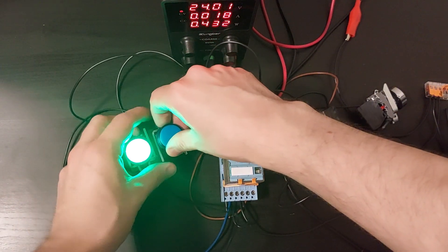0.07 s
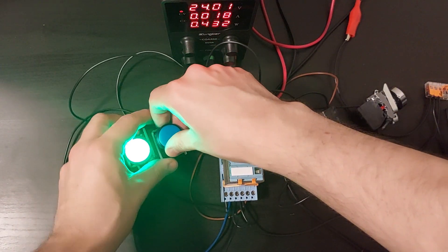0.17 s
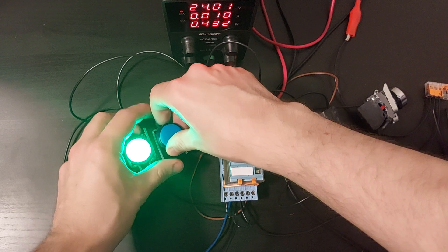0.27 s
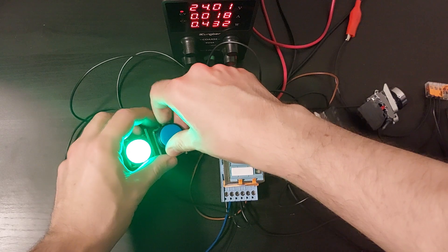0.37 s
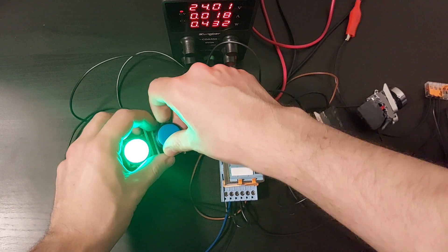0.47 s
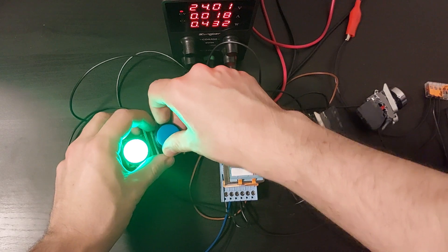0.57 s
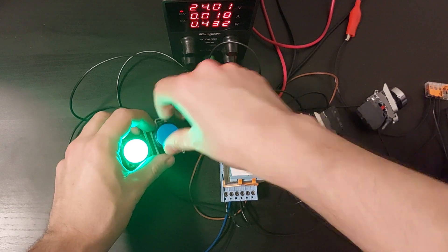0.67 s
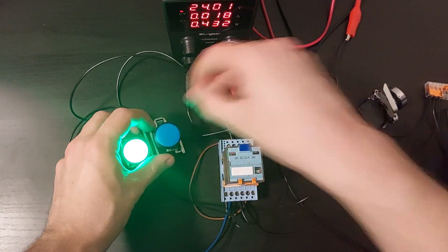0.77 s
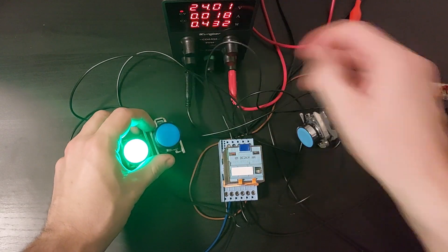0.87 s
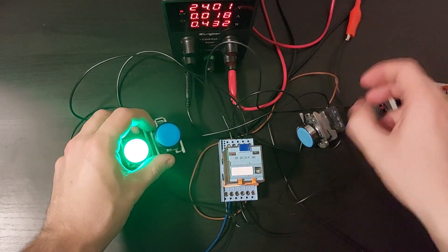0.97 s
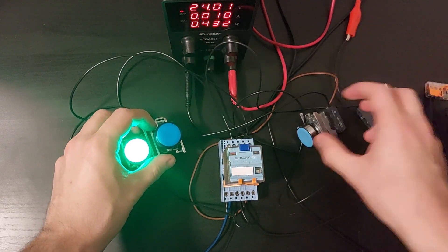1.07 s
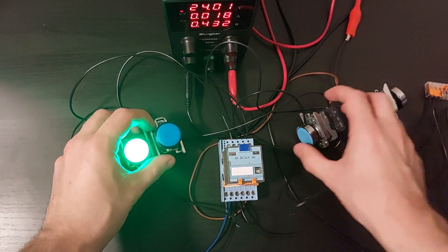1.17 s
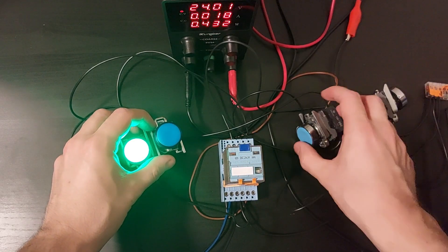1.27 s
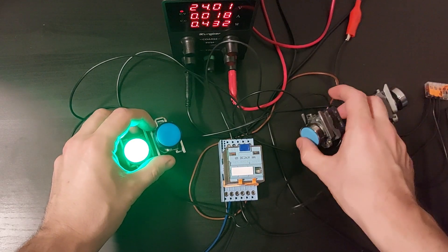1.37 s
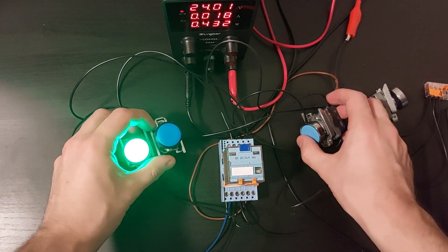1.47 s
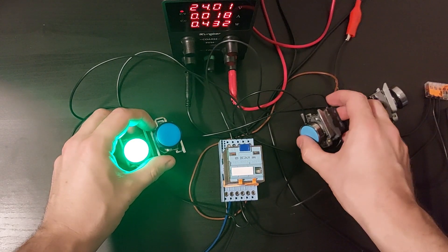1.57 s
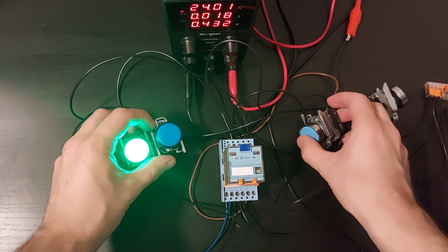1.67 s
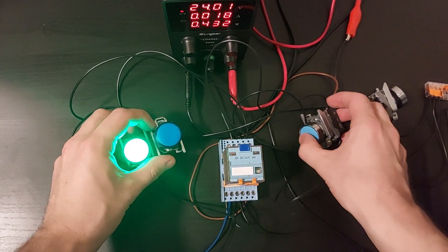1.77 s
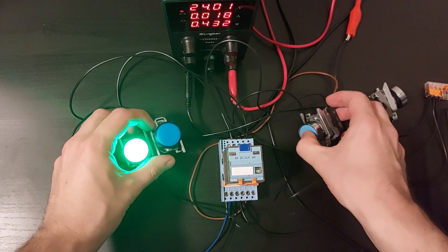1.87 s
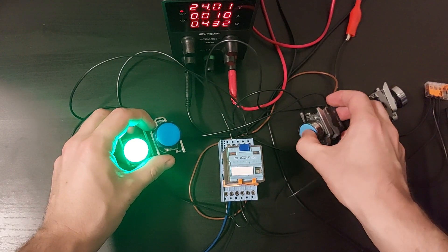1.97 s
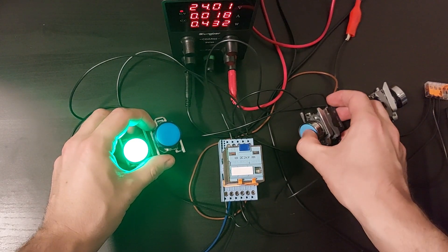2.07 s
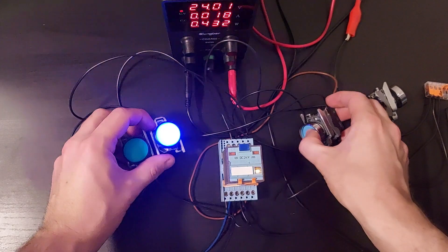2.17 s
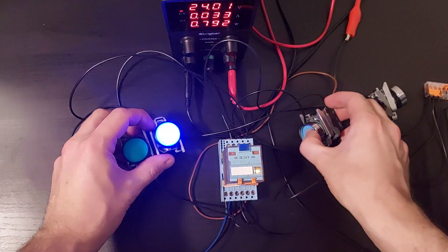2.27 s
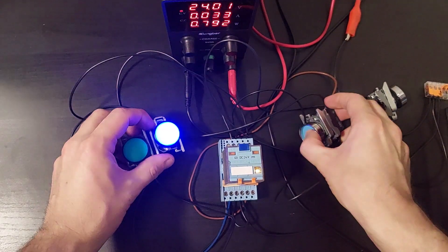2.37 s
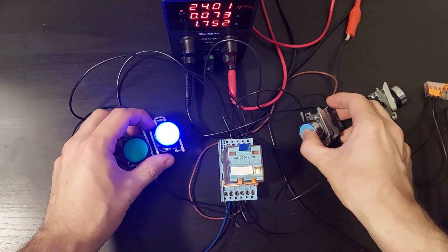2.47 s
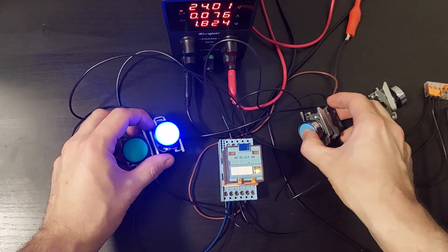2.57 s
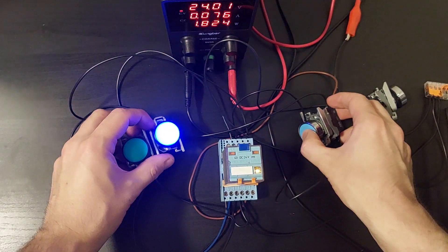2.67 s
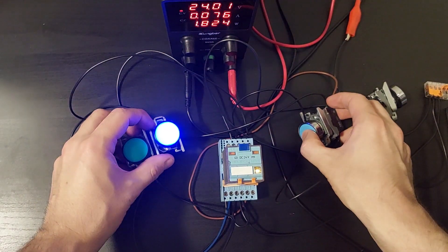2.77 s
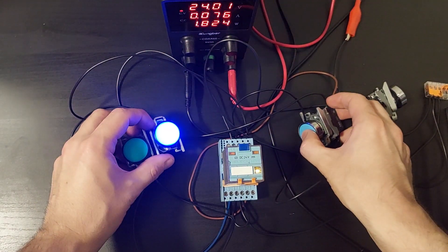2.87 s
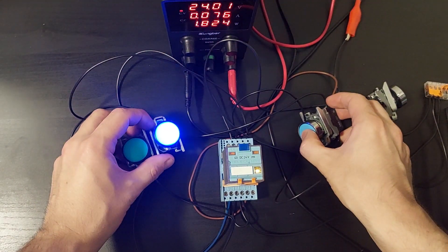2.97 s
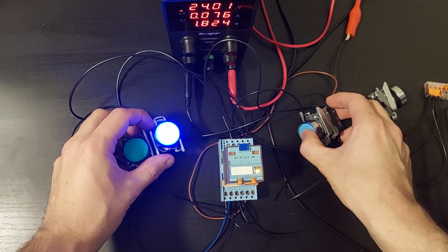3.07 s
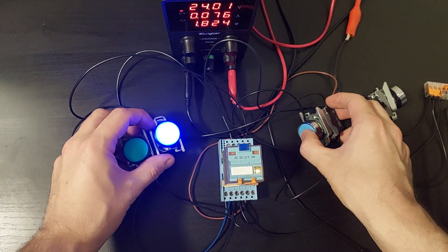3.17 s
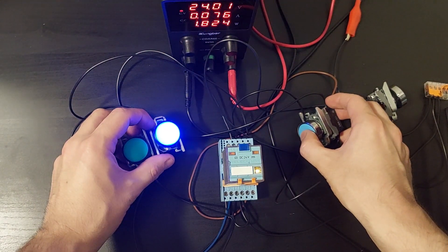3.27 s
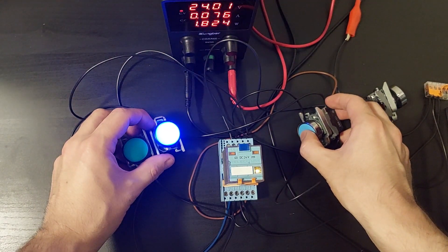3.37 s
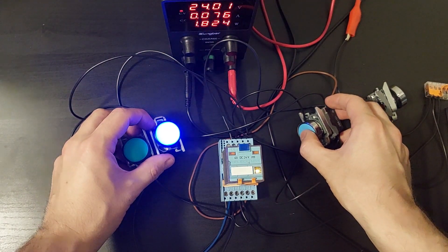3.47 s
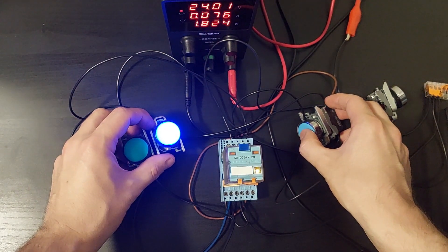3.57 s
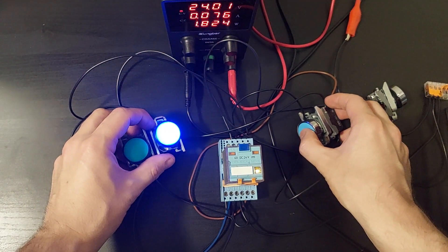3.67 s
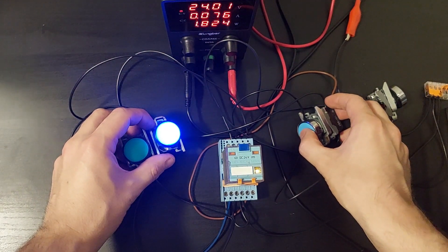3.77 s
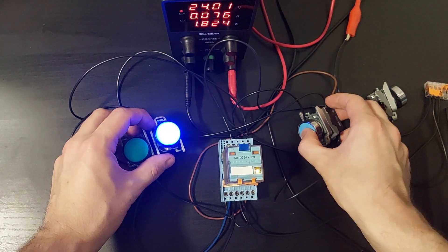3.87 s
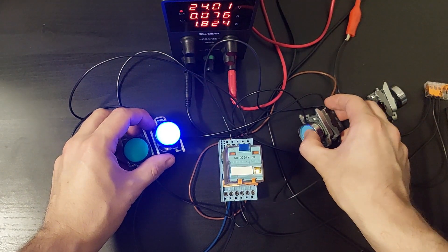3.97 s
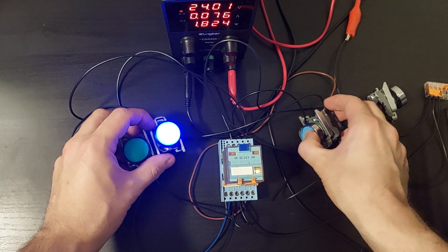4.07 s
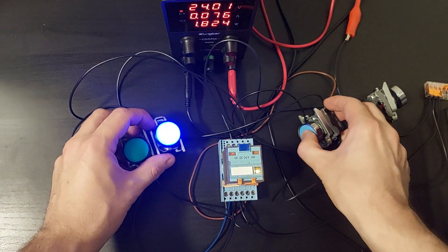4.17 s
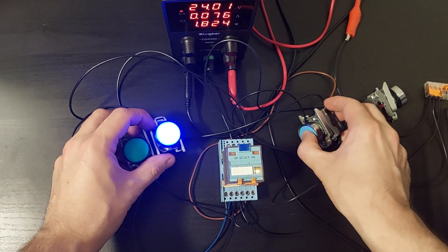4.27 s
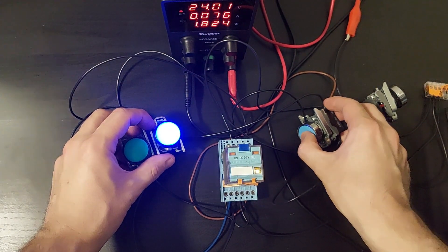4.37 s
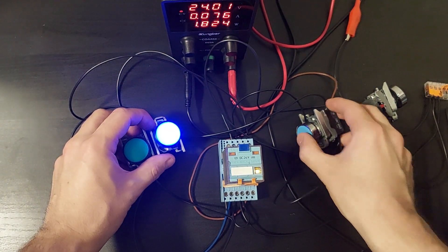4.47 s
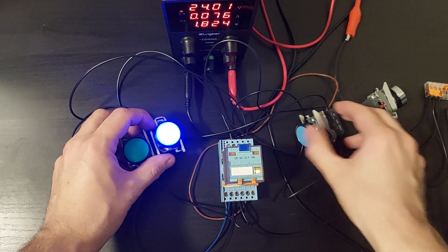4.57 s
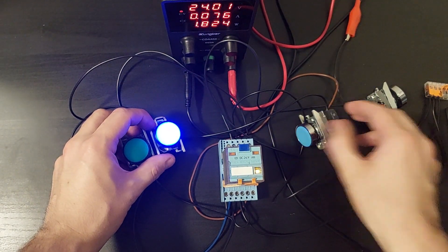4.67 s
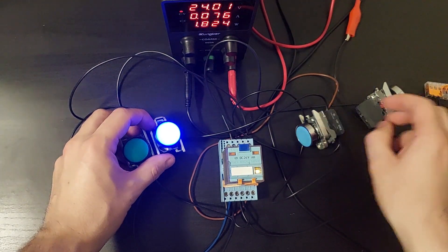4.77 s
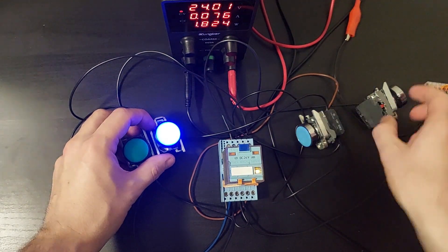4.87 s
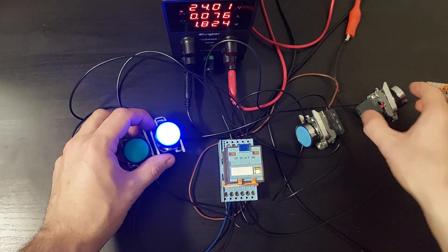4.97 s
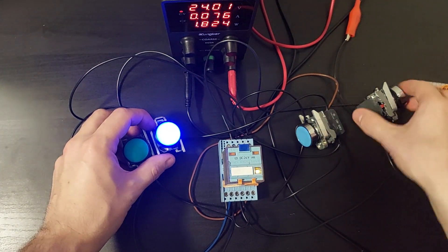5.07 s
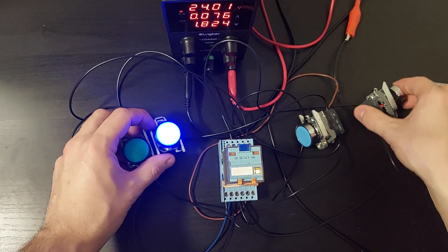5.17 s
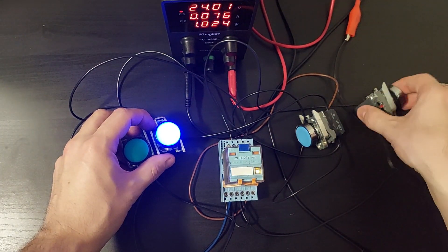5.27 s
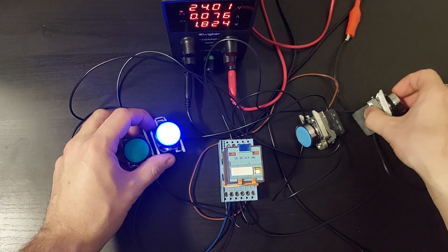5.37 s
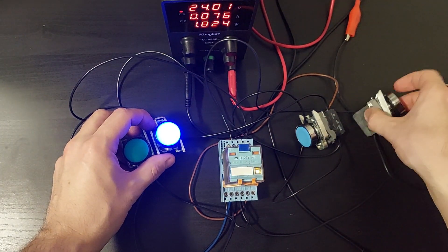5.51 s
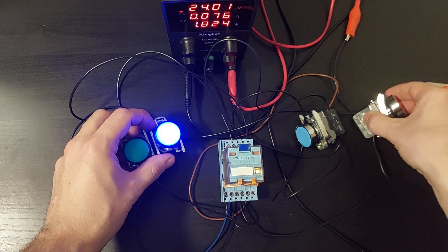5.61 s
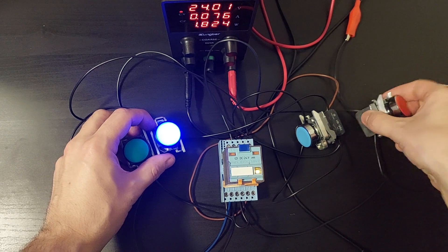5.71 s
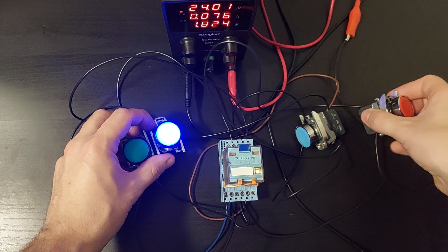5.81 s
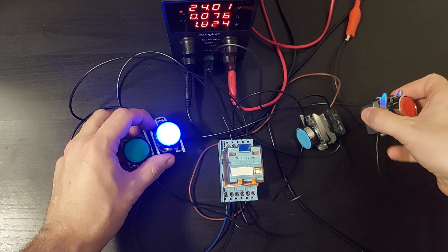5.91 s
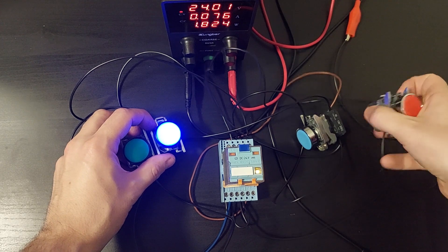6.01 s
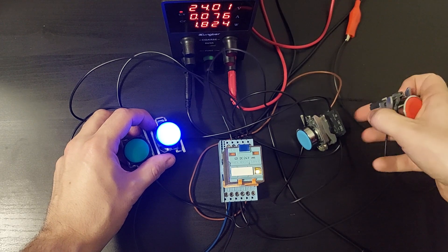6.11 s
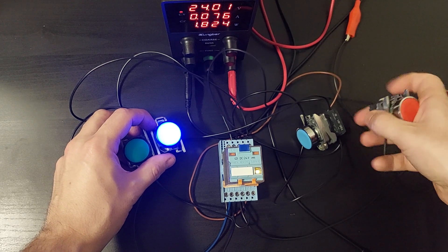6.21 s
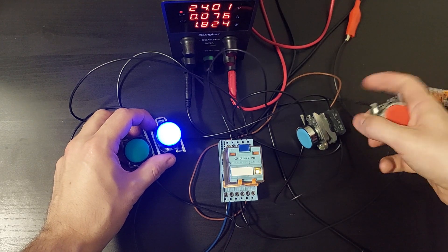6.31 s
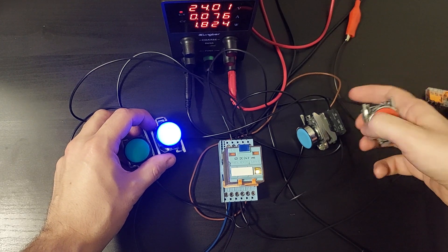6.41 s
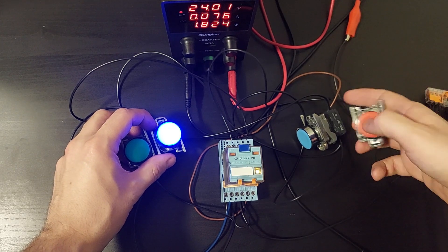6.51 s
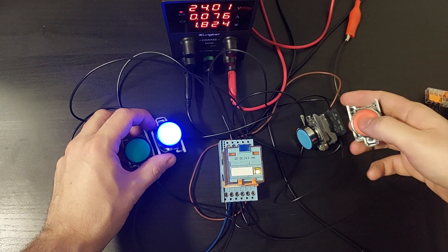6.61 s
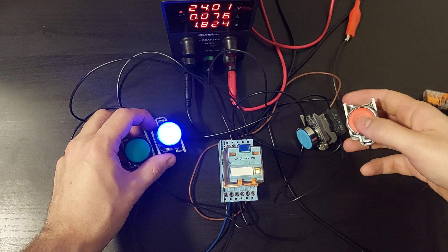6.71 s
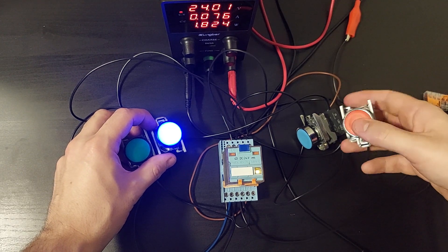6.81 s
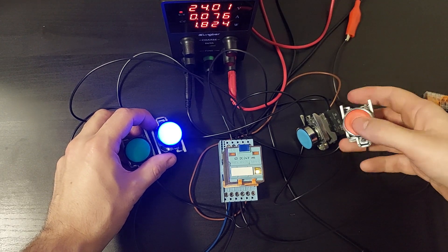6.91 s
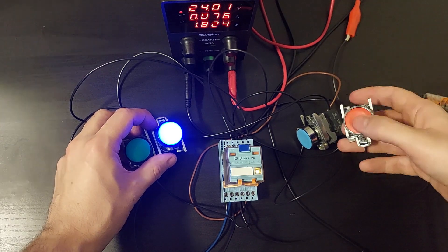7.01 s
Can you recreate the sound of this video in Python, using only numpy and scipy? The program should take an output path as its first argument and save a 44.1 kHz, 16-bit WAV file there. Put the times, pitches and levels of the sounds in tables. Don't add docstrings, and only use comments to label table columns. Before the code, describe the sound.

Close plastic clicks and dull wooden thumps as hands shift switches, one loud metallic relay snap, a quiet spell, then a harder burst of clicks.

```python
import sys
import numpy as np
from scipy import signal
from scipy.fft import rfft, irfft
from scipy.io import wavfile
from scipy.ndimage import uniform_filter1d

SR = 44100
rng = np.random.default_rng(int(sys.argv[2]) if len(sys.argv) > 2 else 0)


def magnitude_from_level(level_db):
    exponent = np.asarray(level_db, float) / 20
    return 10 ** exponent


def file_out(sig):
    cols = np.atleast_2d(sig).T
    lim = np.clip(cols, -1, 1)
    pcm = np.round(lim * 32767).astype(np.int16)
    wavfile.write(sys.argv[1], SR, pcm)


N = 310905


def at_hz(points, hz):
    table = np.array(points)
    return np.interp(np.log(hz), np.log(table[:, 0]), table[:, 1])


def rms_one(x):
    return x / np.sqrt(np.mean(x ** 2) + 1e-20)


def band(x, low_hz, high_hz):
    return signal.sosfilt(signal.butter(2, [low_hz, min(high_hz, .45 * SR)], "band", fs=SR, output="sos"), x)


def ring(force, hz, t60):
    r, w = magnitude_from_level(-60 / (t60 * SR)), 2 * np.pi * hz / SR
    return signal.lfilter([0, np.sin(w)], [1, -2 * r * np.cos(w), r * r], force + 1e-18)


def add(out, sound, s, pan_db=0., lag_s=0.):
    starts = (s + max(lag_s, 0), s + max(-lag_s, 0))
    for side, start, sign in zip(out, starts, (.5, -.5)):
        i = max(round(start * SR), 0)
        side[i:i + len(sound)] += sound[:N - i] * magnitude_from_level(sign * pan_db)


def gated(s, length_s, db):
    away = np.abs(np.arange(N) / SR - s) / (length_s / 2)
    gain = magnitude_from_level(db - 14.5 * away) * (away < 1)
    return uniform_filter1d(gain, size=600)


def contacts(count, t, fade_s, rough):
    force = rough * rng.standard_normal((count, len(t))) * np.exp(-t / fade_s)
    force[:, 0] = 3
    spectrum = rfft(force)
    colour = uniform_filter1d(np.abs(spectrum), size=15)
    even = spectrum * colour.mean(axis=1, keepdims=True) / colour
    return irfft(even, len(t)) * np.exp(-t / (4 * fade_s))


def placed(tables):
    # lowest bench modes in dB, left over right for knocks in dB,
    # broad crack of ticks in dB, left over right for ticks in dB.
    places = [
        (4, 2.5, 3.5, 0),
        (-2, -4, 10, 2),
        (-8, -5, 4, 0.5),
        (-7, -6, -2, -1),
    ]
    upper_modes_db = [-4, 2.5, 3, 1]
    touches = []
    for rows, place, upper_db in zip(tables, places, upper_modes_db):
        touches += [(row, (*place, upper_db)) for row in rows]
    return touches


def floor():
    # frequency in Hz, level in dB per Hz.
    noise_colour = [(15, -38.5), (28, -5.5), (45, -5), (110, -1), (150, -2), (190, -15.5), (270, -9.5),
                    (400, -19), (800, -25), (2000, -32.5), (4500, -40.5), (9000, -38.5), (12500, -39.5),
                    (15500, -63.5)]
    # frequency in Hz, likeness of left and right (1 is the same noise).
    likeness = [(60, 1), (240, 0.5), (950, 0), (3800, 0), (15000, 0.14)]
    hz = np.maximum(np.fft.rfftfreq(N, 1 / SR), 10)
    mid, side = rfft(rng.standard_normal((2, N))) * magnitude_from_level(at_hz(noise_colour, hz))
    alike = np.clip(at_hz(likeness, hz), 0, 1)
    pair = np.sqrt(1 + alike) * mid + np.sqrt(1 - alike) * side * np.array([[1], [-1]])
    return magnitude_from_level(-68) * rms_one(irfft(pair, N))


def hum():
    # frequency in Hz, amount of waver, left over right in dB, lead of the left in radians.
    lines = [(66, 1, 1.5, 0.27), (95.7, 0.17, -3, 0.14), (130.5, 1, 4.5, 0.42)]
    # level in dB at mean load, share of the load's swing.
    follows = [(-64, .25), (-64.5, 1), (-68, 0.13)]
    # time in seconds, level in dB.
    load = [(0.0, -73), (0.61, -58.5), (0.76, -77), (1.25, -55.5), (1.57, -64.5), (1.98, -54),
            (2.63, -61.5), (2.77, -55.5), (3.16, -58), (3.45, -72.5), (4.69, -66.5), (4.85, -76),
            (5.46, -51), (5.75, -70), (6.09, -58), (6.48, -60), (6.77, -79.5), (7.05, -79)]
    out, t, sides = np.zeros((2, N)), np.arange(N) / SR, np.array([[.5], [-.5]])
    load_db = np.interp(t, *np.transpose(load))
    for (hz, waver, pan_db, lead), (db, share) in zip(lines, follows):
        steps = np.cumsum(rng.standard_normal(80)) * 0.58 * np.sqrt(waver)
        phase = 2 * np.pi * hz * t + np.interp(t, np.arange(80) / 10, steps)
        level = magnitude_from_level(db + share * (load_db - load_db.mean()))
        out += np.sqrt(2) * level * np.sin(phase + 2 * lead * sides) * magnitude_from_level(sides * pan_db)
    return out


def drags():
    # moment of
    # most pressure in seconds, length in seconds, scrape in dB, treble in dB against the scrape.
    strokes = [(0.0, 0.051, -46, -15), (0.566, .12, -84, -5), (1.357, 0.11, -77, -10),
               (1.49, 0.21, -76, -11), (1.637, 0.099, -64.5, -18), (1.774, 0.086, -82, 6),
               (4.044, 0.087, -71.5, -8), (4.29, .15, -90, 7), (4.563, 0.28, -82.5, -21.5),
               (5.263, 0.16, -80, -12), (5.416, 0.088, -46, -20), (5.522, 0.3, -65, -10.5),
               (5.806, 0.2, -69, -16.5), (5.999, 0.18, -63.5, -17.5), (6.077, 0.1, -61, -7.5),
               (6.529, 0.07, -67.5, -26), (6.796, 0.18, -72, -35)]
    # moment of most pressure in seconds, length in seconds,
    # level in dB, pitch in Hz.
    squeaks = [(1.287, 0.19, -76.5, 2280), (1.467, 0.081, -74, 2170), (1.546, .05, -78, 2270),
               (1.647, .05, -74, 2240), (1.588, 0.035, -68, 2290), (4.021, 0.05, -68, 2160),
               (6.53, .055, -61.5, 2293), (6.581, 0.017, -64, 2700)]
    sizes = magnitude_from_level(2 * rng.exponential(1, (2, N))) * rng.standard_normal((2, N))
    grains = sizes * (rng.random((2, N)) < 5000 / SR)
    low = rms_one(band(band(grains[0], 310, 1740), 400, 4000))
    high = rms_one(band(grains[1], 2300, 14000))
    out = np.zeros(N)
    for s, length_s, db, treble_db in strokes:
        out += gated(s, length_s, db) * (low + magnitude_from_level(treble_db) * high)
    for s, length_s, db, hz in squeaks:
        out += gated(s, length_s, db) * rms_one(ring(sizes[0], hz, 0.025))
    return out * np.ones((2, 1))


def ticks():
    # start in seconds, peak in dB, ring in Hz, treble in dB.
    lamp = [(0.0, -30.5, 2290, -8), (0.6716, -58.5, 2340, 10), (0.6943, -44, 2320, 1),
            (0.7297, -30.5, 2860, -9.5), (0.9771, -48.5, 2400, 6)]
    start = [(1.344, -72, 2380, -20), (1.6152, -56, 2430, -23), (1.727, -69, 2480, -12),
             (1.737, -61, 2720, 3), (1.7473, -58, 2450, 18.5), (1.7589, -59, 2430, -18),
             (1.7929, -77, 2140, -15), (2.0894, -67.5, 8000, -1), (2.1322, -55, 2230, -25),
             (2.454, -45.5, 3700, -41), (2.4776, -47, 2184, -40), (2.5504, -60, 2360, 20)]
    release = [(3.8487, -65.5, 2230, -21), (3.9115, -62, 2120, -23), (4.0006, -58.5, 2060, 21.5),
               (4.033, -50.5, 1915, -18), (4.2443, -44.5, 5070, 7.5), (4.2824, -49, 3450, -30),
               (4.3121, -55, 2050, -20), (4.469, -65, 2064, -12)]
    stop = [(5.336, -47.5, 1940, -5), (5.3808, -71, 1820, -7), (5.4044, -33, 2500, -25),
            (5.4257, -25.5, 2330, -3), (5.43, -40.5, 6260, -20), (5.444, -33.5, 2650, -28),
            (5.447, -47, 6100, -20), (5.4688, -34.5, 2550, 0.5), (5.5114, -33.5, 2700, -27),
            (5.5544, -52, 6580, -15), (5.566, -59, 1840, -12), (5.599, -34, 2500, -9),
            (5.7713, -59, 2220, -20), (5.8335, -48.5, 2064, 6), (6.1433, -40, 2720, 9),
            (6.3088, -35.5, 2580, 1.5), (6.383, -64.5, 2470, 20.5), (6.4601, -54, 2670, 7.5),
            (6.5151, -56, 2260, -25), (6.574, -57, 2200, 10.5), (6.6124, -33, 2660, -2),
            (6.6467, -38, 2920, 3)]
    out, t = np.zeros((2, N)), np.arange(round(.08 * SR)) / SR
    touches = placed([lamp, start, release, stop])
    bursts = contacts(count=len(touches), t=t, fade_s=.003, rough=.6)
    lags = rng.uniform(-1, 1, len(touches)) * 0.00042
    for burst, lag_s, ((s, db, hz, treble_db), (_, _, mid_db, pan_db, _)) in zip(bursts, lags, touches):
        shell = ring(burst, hz, .01)
        crack = .5 * magnitude_from_level(mid_db) * band(burst, 2000, 6100)
        tick = band(crack - 0.69 * shell / np.abs(shell).max(), 1500, 19000)
        treble = .5 * magnitude_from_level(treble_db) * band(burst, 4700, 18000)
        add(out, magnitude_from_level(db - 4.0) * (tick + treble), s, pan_db, lag_s)
    return out


def bench():
    # frequency in Hz, level in dB, time to fall 60 dB in seconds.
    top_modes = [(250.2, -2.5, 0.11), (312.3, 1, 0.2), (343.2, 1, 0.21), (326, -4.5, 0.06),
                 (378.5, -5, 0.21), (435.4, -11.5, 0.39), (475.5, -9, 0.059), (543.2, -12, 0.21),
                 (628, -12.5, 0.037), (751.3, -19.5, 0.055), (856, -24.5, 0.18)]
    # time in seconds, peak in dB, rattle in dB, contact in ms.
    lamp = [(0.0, -27.5, 2, 1.1), (0.241, -59.5, -40, 14.7), (0.356, -55, -26.5, 10),
            (0.404, -52.5, -0.5, 13), (0.515, -40.5, 2, 9.3), (0.538, -25, -5.5, 14.9),
            (0.691, -41, 10.5, 21), (0.729, -35, 15, 10.4), (0.76, -71, 12, 8.4), (0.979, -60, 19, 3.2)]
    start = [(1.27, -58, 0, 8.7), (1.309, -50.5, -2, 10.6), (1.347, -50, 1, 6.1), (1.426, -43, 1, 11.5),
             (1.446, -35, 2.5, 8.9), (1.523, -31.5, -5.5, 12), (1.566, -46.5, -7, 9.2),
             (1.616, -34.5, -29, 13.4), (1.635, -33.5, -15, 10), (1.699, -45.5, -1, 9.2),
             (1.751, -40.5, 9.5, 20), (1.793, -36, 5.5, 9.2), (1.937, -46.5, -5.5, 15.7),
             (2.092, -51.5, 1.5, 10.6), (2.135, -51, 10, 12), (2.187, -51, 4.5, 12.6),
             (2.242, -39, 15, 7.6), (2.443, -38, 1.5, 8.5), (2.48, -41, 6, 7.8), (2.551, -49.5, 4.5, 9.7),
             (2.68, -57, 6.5, 6.3)]
    release = [(3.852, -61.5, 10, 10.5), (3.97, -54.5, -7, 16.7), (4.024, -39, -4.5, 19.6),
               (4.085, -43, -14, 9), (4.236, -56, -4, 6), (4.267, -51.5, 4.5, 8.1), (4.299, -49, 10, 11),
               (4.485, -47.5, -10, 9.6), (4.635, -52.5, -9, 8.8)]
    stop = [(5.217, -55, -6, 9), (5.251, -48, -33, 10), (5.359, -41.5, 4.5, 14), (5.387, -32, -17, 11),
            (5.424, -26.5, 8, 8), (5.47, -37, -8, 8), (5.893, -56, -7, 10), (5.948, -43, -10, 14),
            (5.998, -57, 21, 9), (6.743, -55, -8, 15), (6.776, -53.5, -4, 8)]
    # level in dB, pitch in Hz, time to fall 60 dB in seconds.
    wrist = (-30.5, 86, 0.047)
    wrist_times = (5.343, 5.367)
    out, t = np.zeros((2, N)), np.arange(round(.25 * SR)) / SR
    knocks = placed([lamp, start, release, stop])
    luck_db = rng.normal(0, 3, (len(knocks), len(top_modes)))
    phases = rng.uniform(0, 2 * np.pi, luck_db.shape)
    rough = rng.standard_normal((len(knocks), len(t)))
    hz, mode_db, t60 = np.transpose(top_modes)[:, :, None]
    fade_db = -60 * np.maximum(t - 0.013, 0) / np.clip(t60, .05, .16)
    for k, ((s, db, rattle_db, contact_ms), (low_db, pan_db, _, _, upper_db)) in enumerate(knocks):
        contact_s = np.clip(contact_ms, 1, 40) / 1000
        swell = np.sin(np.pi / 2 * np.minimum(t / contact_s, 1)) ** 2
        strength_db = mode_db + luck_db[k][:, None] + low_db * (hz < 275) + upper_db * (hz > 420)
        modes = magnitude_from_level(strength_db + fade_db) * np.sin(2 * np.pi * hz * t + phases[k][:, None])
        boom = swell * modes.sum(axis=0)
        loose = rough[k] * swell * magnitude_from_level(-60 * t / 0.17)
        rattle = band(band(loose, 600, 2300), 600, 2300)
        knock = boom / np.abs(boom).max() + magnitude_from_level(rattle_db - 21.5) * rattle / np.abs(rattle).max()
        add(out, magnitude_from_level(db) * knock, s - .7 * contact_s, pan_db)
    db, hz, t60 = wrist
    push = np.r_[np.hanning(200) / 100, 0 * t]
    for s in wrist_times:
        add(out, -magnitude_from_level(db) * ring(push, hz, t60), s, -10.5)
    return out


def relay():
    # time in seconds, level in dB.
    bounces = [
        (2.2136, -45.5),
        (2.2265, -56),
        (2.2302, -20),
        (2.232, -23),
        (2.233, -16),
        (2.2355, -34),
        (2.241, -34),
        (2.2445, -36.5),
    ]
    # frequency in Hz, level in dB, time to fall 60 dB in seconds.
    case_modes = [(1400, -4, .012), (2270, -7, .008), (3540, 2, .016), (4050, 0, .01), (5350, -4, .006),
                  (5800, -3, .008), (7200, -5, .004), (9000, -12, .003), (12400, 3, .004),
                  (13900, -7, .003), (15300, 0, .003)]
    # frequency in Hz, level in dB, time to fall 60 dB in seconds.
    spring_tones = [(2213, -60, 1.25), (3610, -64, .75)]
    snap, t = np.zeros((2, N)), np.arange(round(.1 * SR)) / SR
    bursts = contacts(count=len(bounces), t=t, fade_s=0.0031, rough=0.78)
    for burst, (s, db) in zip(bursts, bounces):
        case = np.zeros(len(t))
        for k, (hz, mode_db, t60) in enumerate(case_modes):
            case += (-1) ** k * magnitude_from_level(mode_db) * ring(burst, hz, np.clip(t60, .002, .016))
        case = band(case, 1150, 19000)
        crack = magnitude_from_level(-6) * band(burst, 2000, 19000)
        add(snap, magnitude_from_level(db) * (case / np.abs(case).max() + crack), s, pan_db=0.5, lag_s=.000023)
    blow = np.r_[1., np.zeros(2 * SR)]
    spring = np.zeros((2, N))
    for hz, db, t60 in spring_tones:
        add(spring, magnitude_from_level(db) * ring(blow, hz, t60), bounces[2][0])
    return snap, spring


def room(x):
    # frequency in Hz, time for echoes to fall 60 dB in seconds.
    echo_times = [(300, 0.25), (1500, 0.21), (4000, 0.17), (9000, 0.2), (14000, 0.15)]
    t = np.arange(round(.4 * SR)) / SR
    mid, side = rng.standard_normal((2, len(t)))
    side = signal.sosfilt(signal.butter(1, 514, "high", fs=SR, output="sos"), side)
    noise = np.array([mid + side, mid - side])
    edges = 100 * 2. ** np.arange(9)
    tail = np.zeros((2, len(t)))
    for k, (low_hz, high_hz) in enumerate(zip(edges, edges[1:])):
        fade = magnitude_from_level(-60 * t / at_hz(echo_times, np.sqrt(low_hz * high_hz)))
        tail += (-1) ** k * band(noise, low_hz, high_hz) * fade
    onset = np.clip(t / 0.0013, 0, 1)
    tail = tail * onset / np.sqrt(np.mean(np.sum(tail ** 2, axis=1)))
    return signal.fftconvolve(x, tail, axes=1)[:, :N]


def scene():
    wood, (snap, spring) = bench(), relay()
    airborne = ticks() + snap + drags()
    echoes = room(magnitude_from_level(1.5) * airborne + magnitude_from_level(-8) * wood)
    return wood + airborne + spring + echoes + hum() + floor()


def low_pass(x):
    return signal.sosfilt(signal.butter(12, 16470, fs=SR, output="sos"), x)


def record(dry):
    dry = signal.sosfilt(signal.butter(2, 29.7, "high", fs=SR, output="sos"), dry)
    mix = signal.sosfilt(signal.cheby2(12, 60, 16300, fs=SR, output="sos"), dry)
    return low_pass(mix)


dry = scene()
out = record(dry)
file_out(out)
```